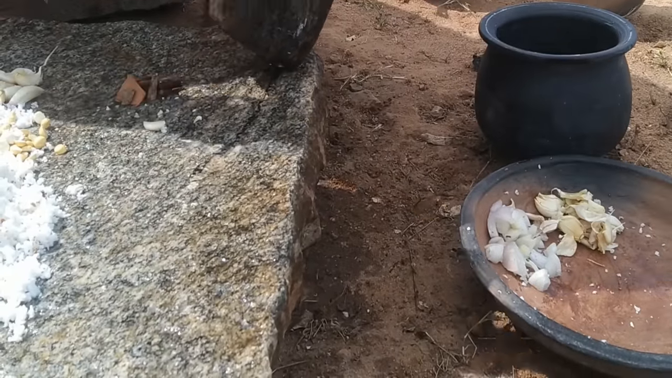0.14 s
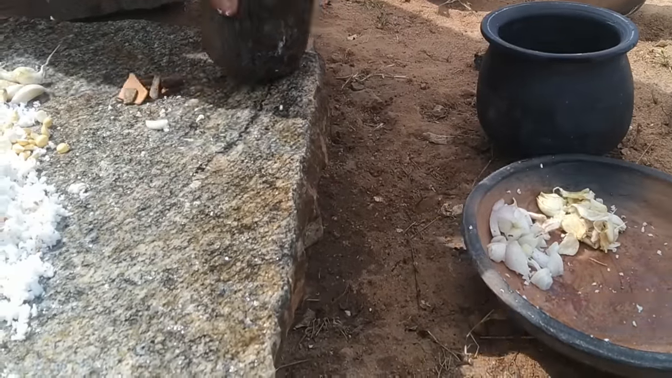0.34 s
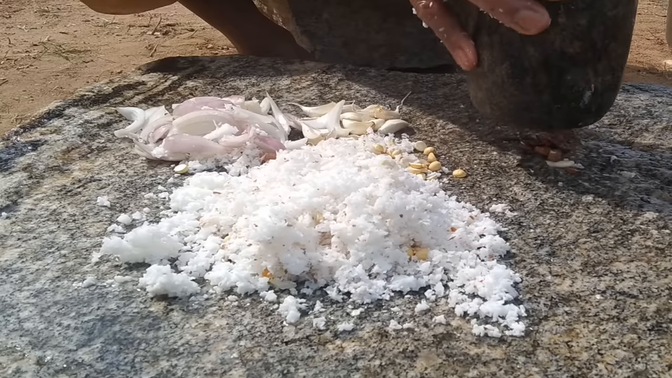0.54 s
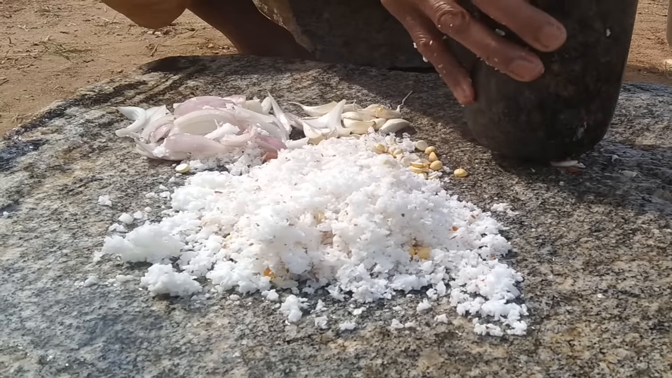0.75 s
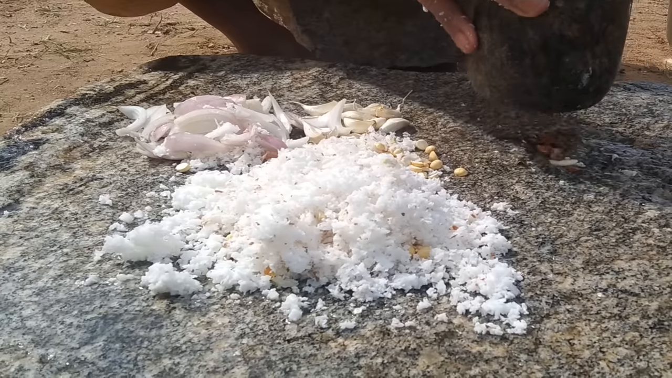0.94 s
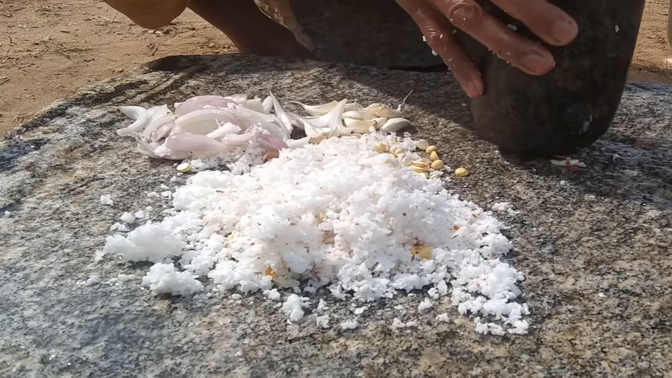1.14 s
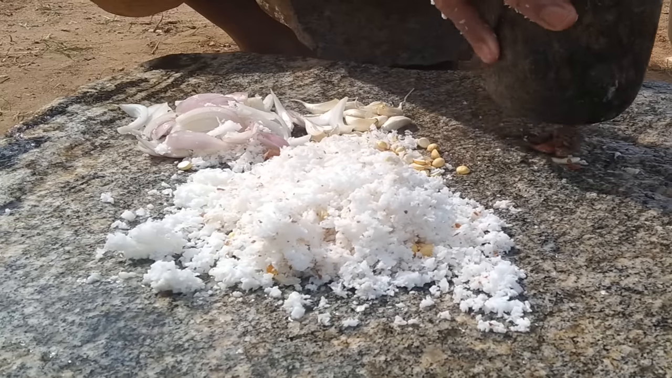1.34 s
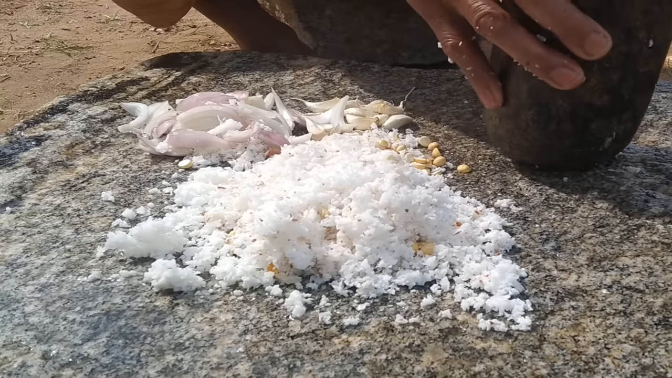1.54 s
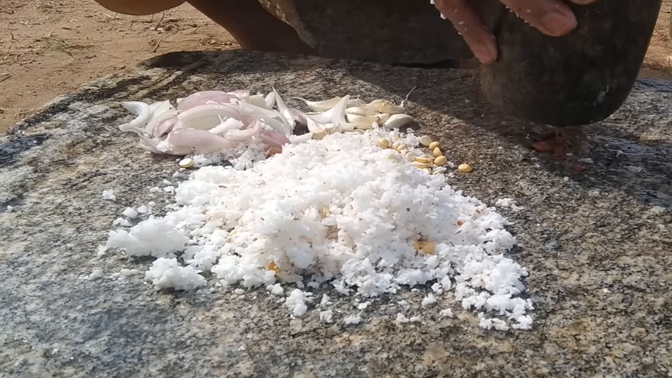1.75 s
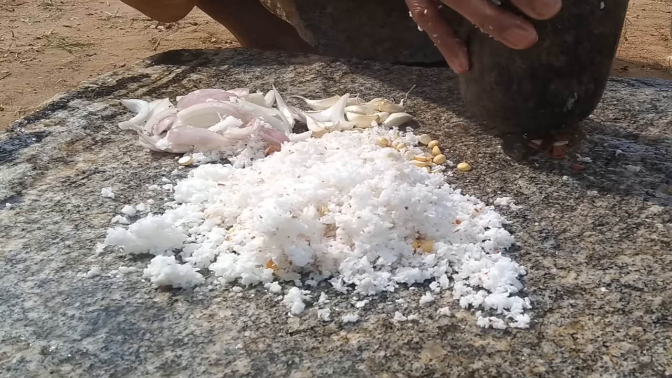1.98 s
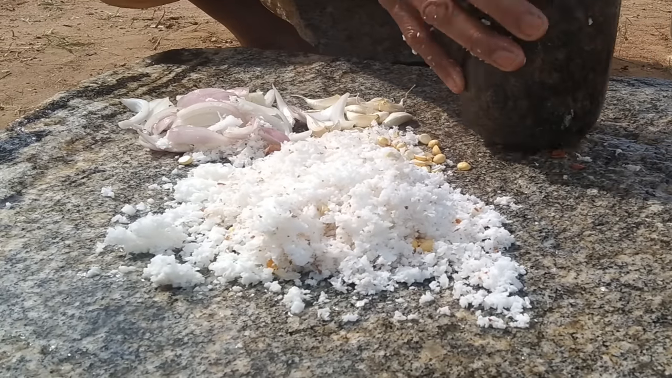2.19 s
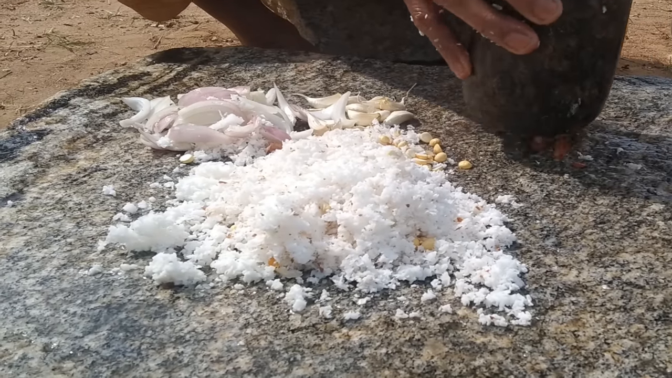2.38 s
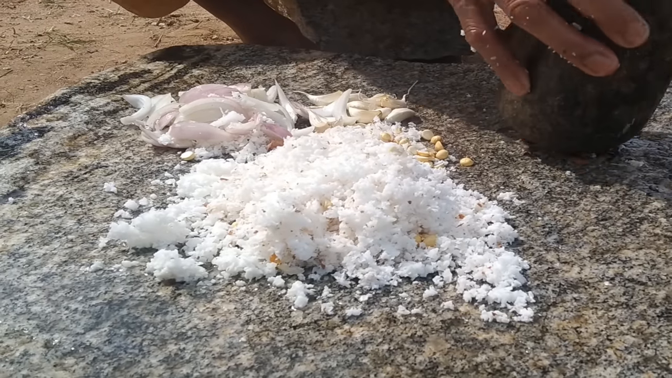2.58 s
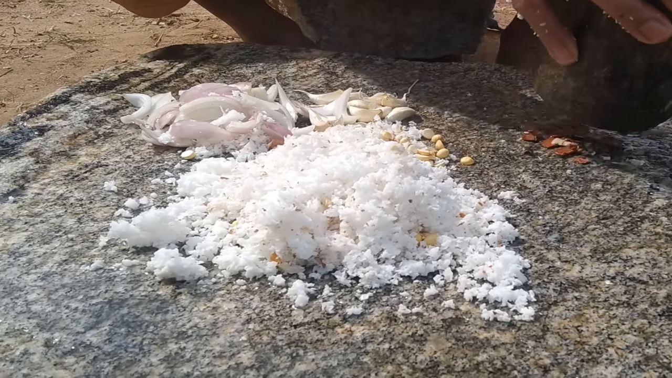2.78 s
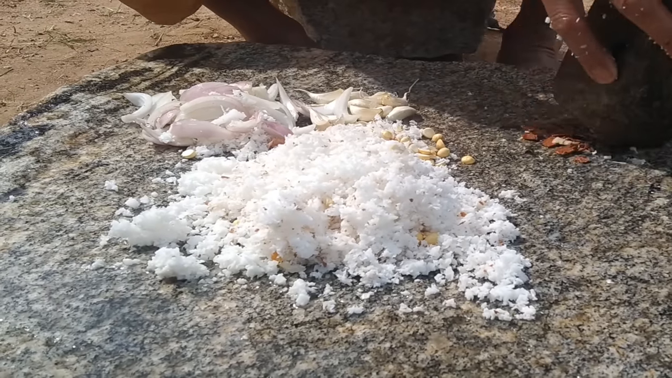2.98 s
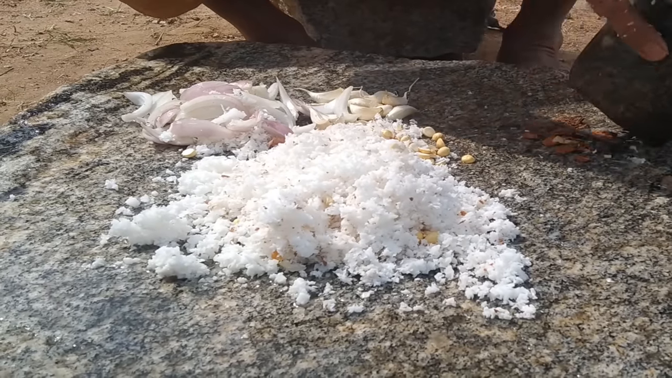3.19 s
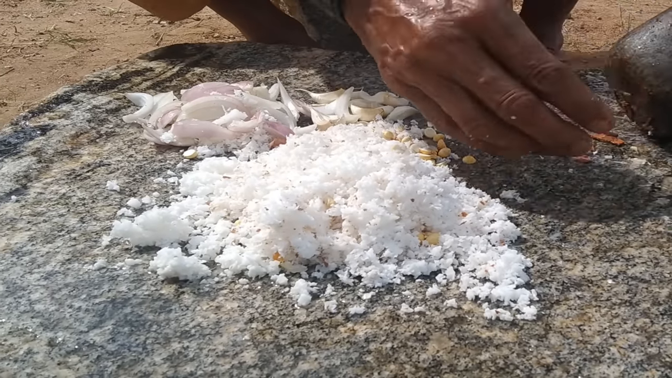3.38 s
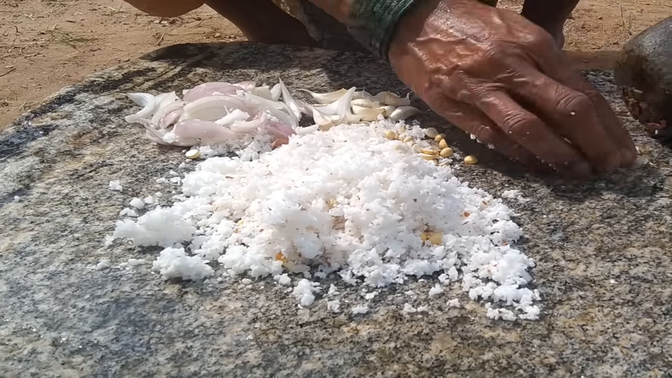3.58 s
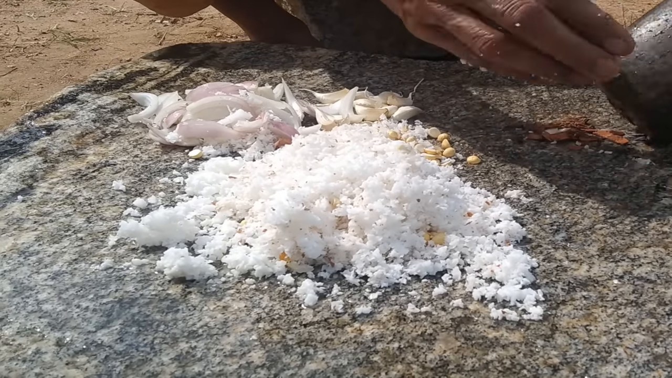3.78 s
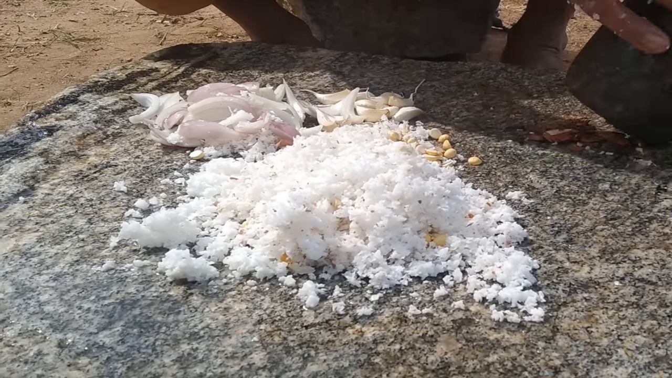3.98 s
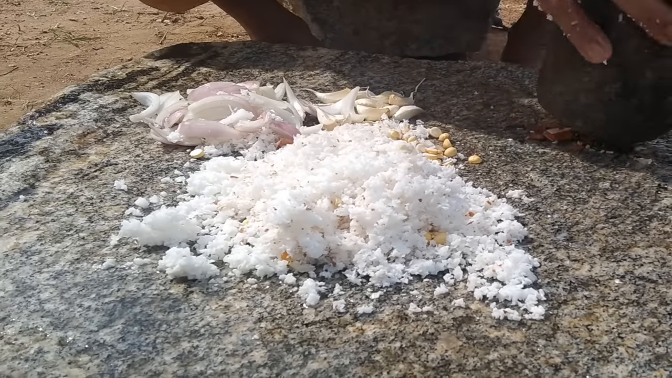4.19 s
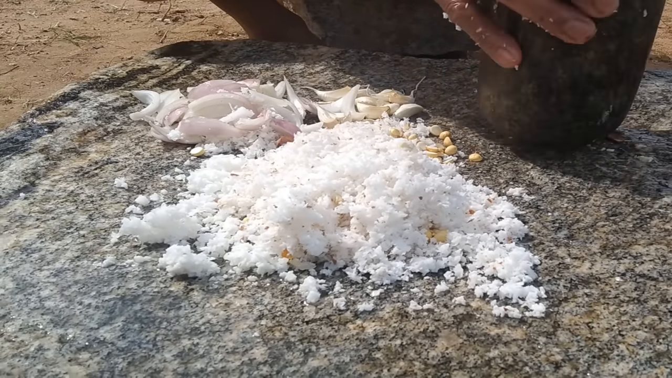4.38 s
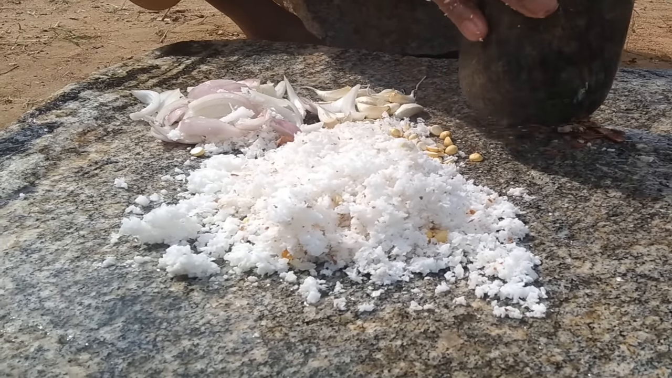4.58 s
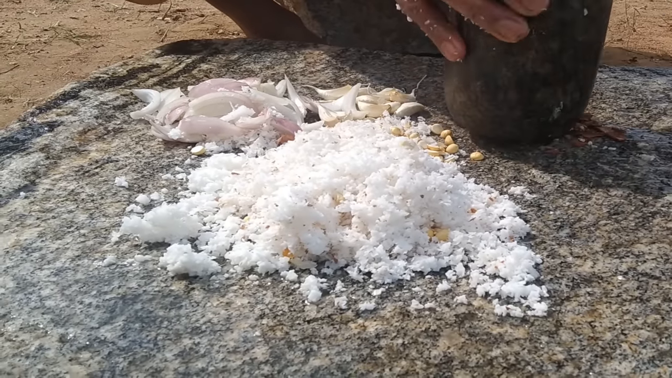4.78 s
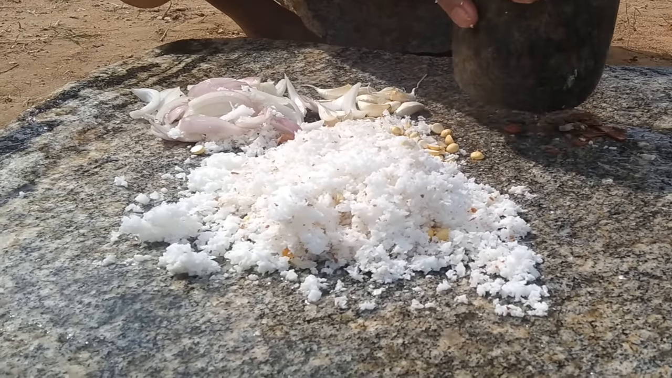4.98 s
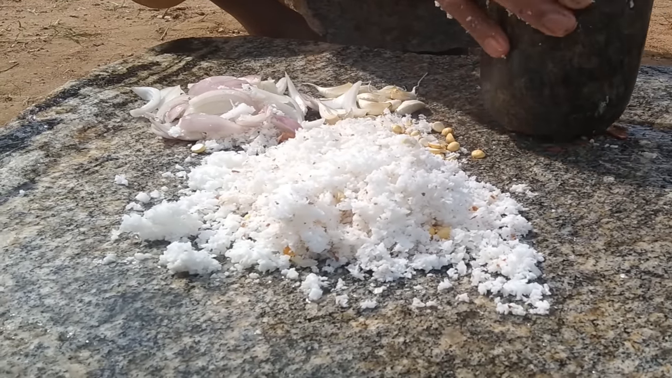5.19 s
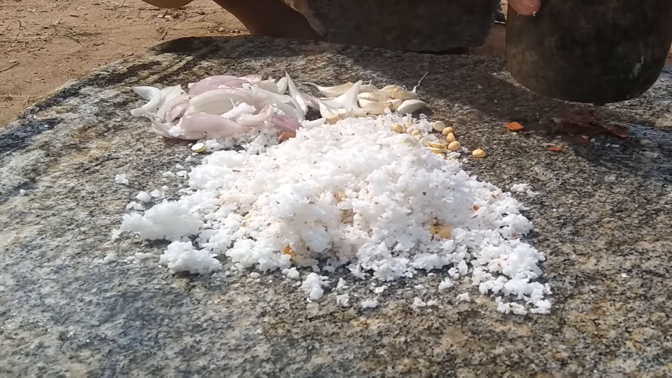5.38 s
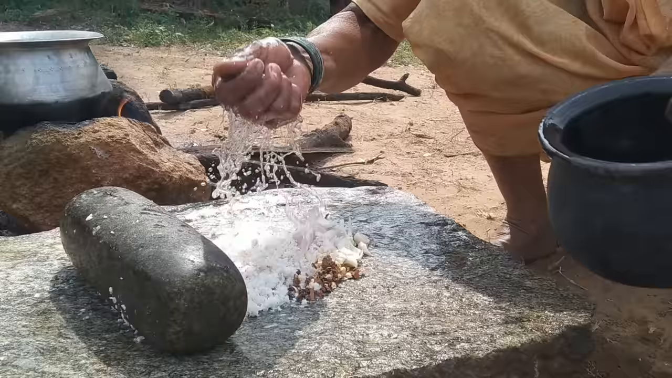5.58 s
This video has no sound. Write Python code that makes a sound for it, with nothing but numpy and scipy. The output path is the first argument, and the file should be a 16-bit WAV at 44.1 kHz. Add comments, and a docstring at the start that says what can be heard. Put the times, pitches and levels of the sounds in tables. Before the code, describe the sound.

Outdoors, very close to a phone: dull, woody-low stone thuds with short hard clacks, dry with faint yard reflections. After an opening noisy rush, seven blows lead to one much sharper stone-on-stone hit. Rolling bumps, a grit skid and light hand rubs fill the gap before four more blows. Bird chirps are bright at right early, then faint; another bird echoes through trees late.

```python
"""Stone pounding on a granite slab

A round stone pounds food on granite outdoors, close to a phone; later it is rolled aside and taken up again.
Contact pushes ring decaying modes of slab and stone; food crunches as dense noise cracks. Birds are gliding
tones: loud near notes on the right, then faint ones there, and a far bird ringing through trees as echoes.
Filtered noise makes the skids, handling, a grainy rush in the first half second, light wind on the microphone
ports and the air."""
import sys
import numpy as np
from scipy import signal
from scipy.fft import rfft, irfft, next_fast_len
from scipy.io import wavfile
from scipy.ndimage import uniform_filter1d

SR = 44100
rng = np.random.default_rng(int(sys.argv[2]) if len(sys.argv) > 2 else 0)


def gain_from_db(level_db):
    """Convert decibel levels to linear amplitude factors (20 dB per decade)."""
    decades = np.asarray(level_db, float) / 20
    return 10 ** decades


def to_wav(s):
    """Save 16-bit WAV."""
    ch = np.atleast_2d(s).T  # columns
    pcm = np.round(np.clip(ch, -1, 1) * 32767)  # PCM
    wavfile.write(sys.argv[1], SR, pcm.astype(np.int16))


N = 249058
WALL_MS = 73.5  # delay of the wall echo
RUSH_END_S = 0.523
# slab modes: mode_hz, relative_db, t60_s
SLAB = [(128, -33, 0.051), (243, -12, 0.033), (298, -14, 0.06), (359.1, 0, 0.06), (430.3, -17.5, 0.022),
        (653.6, 0.5, 0.0096)]
# note shapes: share_of_length [0-1], share_of_pitch_range [0-1], offset_db from the note's level
FALL = [(0, 0.92, -13.5), (.3, .7, -8), (.65, .35, -5.5), (1, 0.049, -7)]
RISE = [(0, 0., -13.5), (.38, .55, -1.5), (.65, .93, -0.5), (1, 0.88, -12.5)]
ARCH = [(0, .16, -42), (.26, .49, 2), (.44, .89, -1.5), (.55, 0.96, -12), (.7, .7, 1.5), (1, 0., -11)]
SPIKE = [(0, .18, -31), (.34, 0.32, -4), (.48, 0.79, -7), (.58, 0.99, -10), (.68, 0.56, -4.5),
         (.83, 0.04, -5), (1, 0.027, -23)]
CLIMB = [(0, 0., -7.5), (.5, .5, 0.), (1, 1., -6.5)]
DIP = [(0, .8, 4), (.45, 0., 2), (1, 1., 5)]
HOOK = [(0, .33, -16.5), (.23, .42, 0.), (.45, .85, -12.5), (.67, 0.97, -3.5), (.8, .5, -4.5),
        (1, 0., -5.5)]


def curve(rows):
    """Join (time_s, value) rows by straight lines over the whole time."""
    time_s, value = np.transpose(rows)
    return np.interp(np.arange(N) / SR, time_s, value)


def along_hz(points, size):
    """Values of (hz, value) points at every bin, straight on a log axis."""
    hz, value = np.transpose(points)
    bin_hz = np.arange(size // 2 + 1) * SR / size
    return np.interp(np.log(bin_hz + 1), np.log(hz), value)


def colour(x, points):
    """Give x a spectrum; white noise comes out with rms 1."""
    size = next_fast_len(N, real=True)
    gain = gain_from_db(along_hz(points, size))
    gain = gain / np.sqrt(np.mean(gain ** 2))
    return irfft(rfft(x, size) * gain, size)[..., :N]


def band(x, lo_hz, hi_hz):
    """Band-pass; white noise comes out with rms near 1."""
    sos = signal.butter(2, [lo_hz, hi_hz], "band", fs=SR, output="sos")
    return signal.sosfilt(sos, x) / np.sqrt(2 * (hi_hz - lo_hz) / SR)


def walk(rate_hz):
    """Random levels drawn rate_hz times a second, joined by straight ramps; spread a little below 1."""
    hold = int(SR / rate_hz)
    steps = np.repeat(rng.standard_normal(N // hold + 1), hold)
    return uniform_filter1d(steps, hold)[:N]


def scatter(x, t60_s, onset_s, patchy_db):
    """Diffuse, clumped echoes of unit energy, drawn afresh for each channel."""
    t = np.arange(SR) / SR
    decay = np.exp(-np.log(1000) * t / t60_s) * np.clip(t / onset_s, 0, 1)
    tail = rng.standard_normal((2, SR)) * decay * gain_from_db(patchy_db * walk(53)[:SR])
    tail = tail / np.sqrt(np.sum(tail ** 2, 1, keepdims=True))
    return signal.fftconvolve(x[None], tail, axes=1)[:, :N]


def spread(points, likeness):
    """Two channels of coloured noise that share part of each band."""
    size = next_fast_len(N, real=True)
    alike = np.clip(along_hz(likeness, size), 0, 1)
    mid, side = rfft(rng.standard_normal((2, size)))
    pair = mid * np.sqrt((1 + alike) / 2) + side * np.sqrt((1 - alike) / 2) * np.array([[1], [-1]])
    return colour(irfft(pair, size)[:, :N], points)


def ring(force, modes):
    """Exponentially decaying modes driven by a force, one signal per mode."""
    swings = []
    for hz, db, t60_s in modes:
        pole = np.exp(2j * np.pi * hz / SR - np.log(1000) / (t60_s * SR))
        swings.append(gain_from_db(db) * signal.lfilter([1], [1, -pole], force).imag)
    return swings


def contacts():
    """Touches of stone on slab as (start_s, thud_db, clack_db): blows, rebounds, others, random rolling bumps."""
    # pounding blows: start_s, thud_db, clack_db, rebound_after_ms, rebound_thud_db
    blows = [(0.6868, -16.5, -29, 9.69, -16), (1.0763, -10, -15.5, 21.1, -18.5),
             (1.4779, -8, -18, 15.22, -23.5), (1.869, -9.5, -19, 18.7, -22), (2.2324, -7.5, -17, 16.9, -20),
             (2.5924, -11, -22, 12.6, -26.5), (2.9427, -10.5, 0, 25.3, -22.5),
             (4.4185, -14.5, -27, 11.6, -24), (4.8003, -11.5, -19, 17.7, -25.5),
             (5.185, -20.5, -28.5, 10.9, -24.5), (5.5581, -12.5, -18, 14.3, -25.5)]
    # other contacts (taps, second touches beside blows, louder rolling bumps): start_s, thud_db, clack_db
    other_contacts = [(0.102, -28, -57), (0.351, -18, -38), (0.576, -61, -45.5), (0.624, -57, -46),
                      (2.866, -58.5, -55), (2.9453, -18, -4.5), (3.127, -44, -44), (3.156, -36, -55.5),
                      (3.22, -29, -34.5), (3.234, -30, -57.5), (3.349, -26, -35.5), (3.363, -34, -39.5),
                      (3.648, -53, -51), (3.674, -39, -54), (3.839, -35, -50.5), (4.025, -37, -81),
                      (4.16, -39, -50.5), (4.412, -22, -35), (4.995, -48, -49), (5.631, -49, -56)]
    rebound_clack_db = -4.5  # against the rebound's thud
    roll_from_s, roll_to_s, bumps = 3.195, 3.4, 26
    bump_db, bump_scatter_db, bump_clack_db, clack_scatter_db = -39.5, 2.5, -20, 4

    rebounds = [(s + ms / 1000, db, db + rebound_clack_db) for s, _, _, ms, db in blows]
    place = (np.arange(bumps) + rng.random(bumps)) / bumps
    roll_s = roll_from_s + (roll_to_s - roll_from_s) * place
    roll_thud_db = bump_db + bump_scatter_db * rng.standard_normal(bumps)
    roll_clack_db = roll_thud_db + bump_clack_db + clack_scatter_db * rng.standard_normal(bumps)
    rolling = list(zip(roll_s, roll_thud_db, roll_clack_db))
    return [row[:3] for row in blows] + rebounds + other_contacts + rolling


def thud(force):
    """The air feels the slab's acceleration, so the push itself comes before the ring."""
    total = np.zeros(N)
    for swing, (hz, _, _) in zip(ring(force, SLAB), SLAB):
        total -= np.diff(swing, n=2, prepend=[0, 0]) / (2 * np.pi * hz / SR) ** 2
    return total


def knocks():
    """A smooth push on the slab, sharper on the stone, then judder on rough granite; both ring their modes."""
    # stone modes: mode_hz, relative_db, t60_s
    stone_modes = [(662, -7, 0.028), (785, -25, 0.064), (900.6, -8, 0.0254), (1001, 0.5, 0.019),
                   (1235, -17, 0.006), (1336, -3, 0.019), (1700, -14.5, 0.023), (2109, -18.5, 0.025),
                   (2480, -18, 0.015), (2902, -19, 0.005), (3635, -19.5, 0.025), (5700, -34, 0.013)]
    soft_contact_ms, hardness = 3.48, 1.37  # the more clack for its thud, the shorter the contact
    soft_chatter_ms, slab_chatter_db, stone_chatter_db = 19.0, -4, -4.5
    chatter_n = 2000

    force = np.zeros((2, N + SR))
    for s, slab_db, stone_db in contacts():
        soft = 1 / (1 + hardness * gain_from_db(stone_db - slab_db))
        contact_n = soft_contact_ms * soft * SR / 1000
        lasts_n = soft_chatter_ms * soft * SR / 1000
        fade = np.exp(-(np.arange(chatter_n) / lasts_n) ** 2) / np.sqrt(lasts_n)
        judder = rng.standard_normal(chatter_n) * fade
        # row of force, level, share of the contact time, judder level
        parts = ((0, slab_db, 0.91, slab_chatter_db), (1, stone_db, 0.3, stone_chatter_db))
        for part, db, share, chatter_db in parts:
            push = np.sin(np.pi * np.arange(0, 1, 1 / (share * contact_n))) ** (1.035 + soft ** 6.1)
            jolts = gain_from_db(chatter_db) * judder
            jolts[0] = 1
            jolts = np.convolve(jolts, push / push.sum())
            start = int(s * SR)
            force[part, start:start + len(jolts)] += gain_from_db(db) * jolts
    clack = sum(ring(force[1, :N], stone_modes))
    # a small stone radiates little below its first mode
    radiation = signal.butter(2, 400, "high", fs=SR, output="sos")
    return thud(force[0, :N]) + signal.sosfilt(radiation, clack)


def crunches():
    """Dense cracks of uneven size that swell as the food gives way and die as the stone lands."""
    # food cracking, mostly just before the stone lands: time_s, level_db
    cracking = [(0.6839, -20.5), (1.074, -24.5), (1.0959, -43), (1.4768, -24), (1.7416, -47.5),
                (1.8671, -20.5), (2.2296, -19), (2.589, -29), (2.942, -48.5), (3.6032, -48), (3.6963, -41),
                (4.4146, -22.5), (4.7953, -21), (4.994, -46), (5.1814, -29.5), (5.5569, -24.5)]
    # crack spectrum: hz, relative_db per Hz
    crack_colour = [(60, -47), (300, -9), (700, 7), (1500, 5.5), (3000, -9.5), (4500, -4.5), (6000, 1),
                    (8000, -8.5), (10500, -29), (16000, -29)]
    half_length_ms = 2.89
    t = np.arange(N) / SR
    gate = np.zeros(N)
    for s, db in cracking:
        gate += gain_from_db(db) * np.exp(-((t - s) * 1000 / half_length_ms - 0.4) ** 2)
    cracks = rng.standard_normal(N) * gain_from_db(3.66 * rng.exponential(1, N) - 13.5)
    return gate * colour(cracks, crack_colour)


def stone_with_echoes():
    """Knocks and crunches with delayed, dulled reflections and a diffuse yard tail, all in the middle."""
    # reflections from nearby surfaces: delay_ms, level_db, top_hz
    reflections = [(9.464, -13, 980), (WALL_MS, -30, 550)]
    yard_db, yard_t60_s = -27.5, 0.36
    hits = knocks() + crunches()
    stone = hits.copy()
    for ms, db, top_hz in reflections:
        lag = int(ms * SR / 1000)
        dulled = signal.lfilter(*signal.butter(2, top_hz, fs=SR), hits)
        stone[lag:] += gain_from_db(db) * dulled[:-lag]
    return stone + gain_from_db(yard_db) * scatter(hits, yard_t60_s, 0.005, 2.0)[0]


def skids():
    """Stone sliding on grit: grainy noise that starts quickly and thins out; faint grit remains in between."""
    # slides: start_s, level_db, length_ms
    slides = [(2.989, -44.5, 60), (3.19, -59.5, 65), (4.001, -51, 20), (4.255, -55.5, 82)]
    t = np.arange(N) / SR
    gate = np.zeros(N)
    for s, db, ms in slides:
        gate += gain_from_db(db) * np.interp((t - s) * 1000 / ms, [0, 0.08, 0.7, 1.2], [0.034, 0.49, 0.52, 0.0045])
    return gate * band(rng.standard_normal(N) * gain_from_db(3.0 * walk(150)), 620, 2500)


def handling():
    """Hands shake the slab's modes in lumps; rubs sound hollow; fingers and grit hiss higher, in grains."""
    # hands and grit around the stone: time_s, level_db
    handling_level = [(0.53, -58.5), (0.86, -64), (1.04, -73), (1.66, -73), (1.93, -65), (2.3, -64),
                      (2.68, -75), (2.92, -72), (3.32, -58.5), (3.42, -66.5), (4.05, -64), (4.25, -68),
                      (4.45, -62.5), (4.89, -73), (5.22, -71), (5.49, -67), (5.65, -64)]
    # hollow rubs near 650 Hz: start_s, length_s, level_db
    rubs = [(0.502, 0.41, -59), (1.857, 0.31, -60.5), (3.09, 0.4, -65), (3.751, 0.294, -70),
            (4.187, 0.42, -56)]
    rumble_db = -6  # slab against scrape
    t = np.arange(N) / SR
    rumble = sum(ring(rng.standard_normal(N) * gain_from_db(0.62 * walk(49)), SLAB))
    hollow = band(rng.standard_normal(N), 585, 720) * gain_from_db(3.5 * walk(50))
    grains = rng.standard_normal(N) * gain_from_db(0.93 * walk(740))
    scrape = band(grains, 1200, 2418) * gain_from_db(3.3 * walk(65))
    strokes = np.zeros(N)
    for s, length_s, db in rubs:
        strokes += gain_from_db(db) * np.sin(np.pi * np.clip((t - s) / length_s, 0, 1)) ** 0.8
    busy = gain_from_db(curve(handling_level)) * (gain_from_db(rumble_db) * rumble / rumble.std() + scrape / scrape.std())
    return (t > RUSH_END_S) * (busy + strokes * hollow / hollow.std())


def courses(groups):
    """Stretch each shape over its notes, giving (time_s, pitch_hz, level_db) points."""
    notes = []
    for shape, rows in groups:
        for s, length_s, lo_hz, hi_hz, db in rows:
            notes.append([(s + a * length_s, lo_hz + b * (hi_hz - lo_hz), db + c) for a, b, c in shape])
    return notes


def whistle(notes, round_ms, fade_ms):
    """A near-pure tone along each note, with rounded bends and soft ends."""
    out = np.zeros(N)
    round_n = int(round_ms * SR / 1000)
    for note in notes:
        s, hz, db = np.transpose(note)
        i = np.arange(int(s[0] * SR), min(int(s[-1] * SR), N))
        pitch_hz = uniform_filter1d(np.interp(i / SR, s, hz), round_n, mode="nearest")
        loud = uniform_filter1d(np.interp(i / SR, s, gain_from_db(db)), round_n, mode="nearest")
        ends = np.clip(np.minimum(i - i[0], i[-1] - i) * 1000 / SR / fade_ms, 0, 1)
        out[i] += np.sqrt(2) * loud * ends * np.sin(2 * np.pi * np.cumsum(pitch_hz) / SR)
    return out


def birds():
    """Right-hand birds flutter, mostly direct, with a slap off the wall; the far bird is mostly tree echo."""
    # right-hand birds: loud near notes, then faint ones from about 2.7 s, perhaps another, distant bird
    # shaped notes, grouped by shape: start_s, length_s, low_hz, high_hz, level_db
    right_notes = [ (FALL, [(0, 0.092, 4760, 6580, -46.5), (.198, 0.1, 4320, 6530, -38.5),
                   (.405, 0.11, 4410, 6760, -36), (3.765, 0.034, 2880, 4020, -57),
                   (2.7, .02, 4000, 4900, -67.5), (4.08, 0.013, 2540, 3340, -65),
                   (5.088, 0.045, 3250, 3730, -61)]), (SPIKE, [(.595, .11, 3860, 6460, -40.5),
                   (.785, .11, 3930, 6285, -32.5)]), (ARCH, [(.965, 0.14, 2844, 4930, -38.5),
                   (1.165, 0.14, 2745, 4600, -43.5), (2.125, 0.084, 1970, 2480, -58),
                   (3.55, 0.073, 2895, 3740, -65.5)]), (RISE, [(2.97, 0.054, 3900, 5070, -56),
                   (3.235, 0.068, 3630, 4730, -59), (3.385, 0.056, 3740, 4890, -60)]),
                   (CLIMB, [(1.8, 0.037, 3750, 5000, -65), (2.665, 0.027, 3070, 3340, -64),
                   (2.735, .052, 3100, 4250, -65.5), (2.82, .047, 3530, 4700, -64),
                   (3.105, 0.05, 3860, 5500, -57), (4.11, 0.044, 3130, 3900, -64),
                   (4.29, .05, 2800, 3760, -68), (4.485, 0.1, 2800, 3770, -65.5),
                   (5.25, .04, 3030, 3450, -62), (5.59, .03, 3820, 4410, -61)]),
                   (DIP, [(3.89, 0.063, 3000, 3620, -69), (4.658, 0.056, 3650, 3990, -61.5)])]
    far_notes = [(FALL, [(3.94, 0.033, 4510, 6900, -49.5)]), (HOOK, [(4.08, 0.093, 3944, 6230, -48),
                 (4.285, 0.11, 3730, 6060, -45.5), (4.49, 0.11, 3450, 6030, -43),
                 (4.7, .12, 3544, 5650, -42.5)])]
    # winding notes, each with its own course: time_s, pitch_hz, level_db
    right_winding = [
        [(1.365, 2730, -54), (1.378, 3030, -49), (1.42, 3100.0, -41.5), (1.437, 2860, -52),
         (1.452, 2470, -53.5)],
        [(1.498, 2880, -47), (1.55, 3207, -41.5), (1.6, 3530, -42), (1.615, 3830, -41.5), (1.633, 3790, -45)],
        [(1.706, 3520, -58), (1.72, 3250.0, -45.5), (1.745, 2310, -57), (1.765, 2710, -49.5), (1.79, 2720, -50),
         (1.86, 2430, -55)],
        [(1.94, 2320, -52.5), (1.96, 2330.0, -60.5), (2.005, 2800, -47.5), (2.017, 3500, -43.5),
         (2.025, 4700, -56), (2.035, 4420, -46), (2.062, 4660, -78)],
        [(2.27, 1910.0, -90), (2.32, 2460, -56.5), (2.375, 2650, -55.5), (2.41, 3130, -49.5),
         (2.435, 3760, -67.5)],
        [(2.535, 3730, -66), (2.56, 3040.0, -52.5), (2.585, 2730, -61), (2.655, 2390, -58)],
        [(4.862, 3960, -60), (4.885, 3610, -57), (4.915, 3655, -62.5), (4.935, 4580, -62), (4.97, 5220, -63)],
    ]
    far_winding = [
        [(4.935, 2880, -55), (4.955, 3760, -44), (4.98, 3362, -58), (5.01, 3770, -47.5), (5.035, 4530, -49),
         (5.06, 4730, -75), (5.1, 3445, -66)],
        [(5.14, 2770, -71), (5.16, 3610, -49), (5.175, 4470, -47), (5.19, 3632, -57), (5.22, 3514, -50),
         (5.26, 4430, -52.5), (5.29, 4480, -61)],
        [(5.38, 6150, -56), (5.41, 4040, -48.5), (5.45, 3310, -51.5), (5.475, 2640, -73)],
        [(5.555, 2933, -52), (5.59, 2858, -52.5), (5.65, 3050, -58)],
    ]

    right = whistle(courses(right_notes) + right_winding, 3.6, 2.9) * gain_from_db(1.5 * walk(130))
    far = whistle(courses(far_notes) + far_winding, 8.8, 0.51)
    # gains in dB: left, right
    direct = right * gain_from_db(np.array([[-9], [5]])) + far * gain_from_db(np.array([[-10], [-6]]))
    right_echo = gain_from_db(-10.5) * scatter(right, 0.5, 0.01, 2.0)
    far_echo = gain_from_db(np.array([[-1.5], [1.5]])) * scatter(far, 0.4, 0.012, 1.5)
    lag = int(WALL_MS * SR / 1000)
    wall = np.r_[np.zeros(lag), right[:-lag]] * gain_from_db(-25.5 + 4.0 * walk(60))
    return direct + wall + right_echo + far_echo


def rush():
    """A grainy broadband noise, almost the same in both channels, that stops at once."""
    # spectrum: hz, relative_db per Hz
    rush_colour = [(35, -48), (60, -12), (338, 1), (924, -11.5), (1700, -2.5), (1910, -4.5), (2300, -5.5),
                   (3190, -15), (5460, -19.5), (6900, -14), (8510, -38.5), (10500, -73), (11500, -60),
                   (14600, -48), (16000, -77)]
    # rush level, to which a constant gain is added: time_s, level_db
    rush_level = [(0.0, -49), (0.352, -47), (0.482, -46.5), (0.52, -48.5)]
    gain_db, grain_db = 5, 2.0
    noise = spread(rush_colour, [(60, 1.0), (200, 1), (3000, 0.99), (5000, 1.0)])
    level_db = curve(rush_level) + gain_db + grain_db * walk(69.3)
    return noise * gain_from_db(level_db) * (np.arange(N) / SR < RUSH_END_S)


def wind():
    """Low buffeting noise, unrelated at the two ports."""
    # mean level: time_s, level_db
    gust_level = [(0.2, -98), (0.49, -51.5), (0.62, -60), (0.71, -50), (1.07, -79.5), (1.59, -62.5),
                  (1.7, -66), (1.79, -57), (2.14, -80), (3.68, -92.5), (4.72, -76), (5.3, -96.5),
                  (5.65, -73.5)]
    gust_colour = [(10, -8.5), (30, -3.0), (70, -5), (200, -16.0), (600, -40), (20000, -90.0)]
    gusts = colour(rng.standard_normal((2, N)), gust_colour)
    flutter_db = np.array([1.2 * walk(15), 3.2 * walk(13)])
    return gusts * gain_from_db(curve(gust_level) + flutter_db)


def air():
    """Steady coloured noise, partly alike left and right, its level wandering slightly."""
    # spectrum: hz, relative_db per Hz
    air_colour = [(35, -26), (60, -6.5), (130, 0.5), (198, -3.5), (593, -0.5), (1550, -6), (2350, -5),
                  (2710, -8), (5210, -8.5), (6740, -10), (10300, -17.5), (11500, -29.5), (14600, -51.5),
                  (16000, -45.5)]
    # left-right likeness: hz, likeness [0-1]
    air_likeness = [(60, 0.6), (290, .85), (1400, 0.31), (3100, 0.5), (6800, 0.3), (15000, 0)]
    mean_db = -61
    return gain_from_db(mean_db + 1.0 * walk(4.565)) * spread(air_colour, air_likeness)


def scene():
    """Stone work in the middle, with birds, rush, wind and air in stereo."""
    return stone_with_echoes() + skids() + handling() + birds() + rush() + wind() + air()


def low_pass(x):
    """Removes everything above the highest recorded frequency."""
    return signal.sosfilt(signal.butter(12, 16540, fs=SR, output="sos"), x)


def record(dry):
    """Peaks are limited at full scale."""
    mix = np.clip(dry, -1, 1)
    return low_pass(mix)


dry = scene()
out = record(dry)
to_wav(out)
```